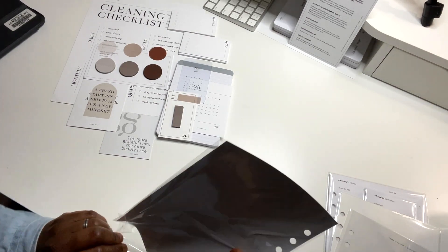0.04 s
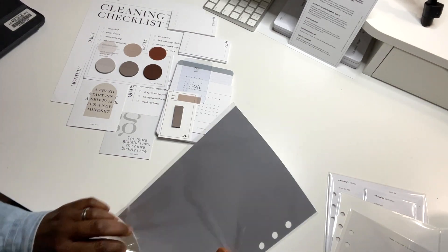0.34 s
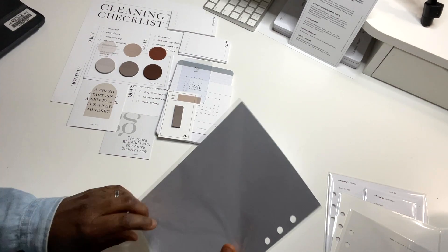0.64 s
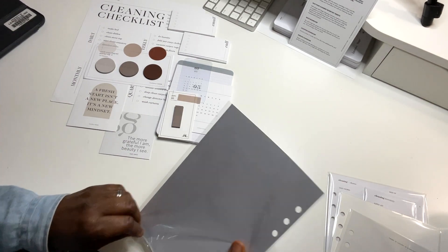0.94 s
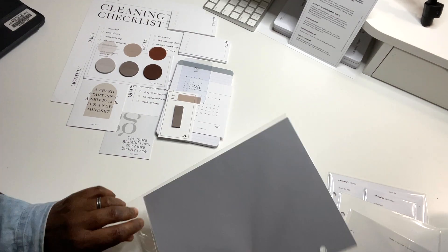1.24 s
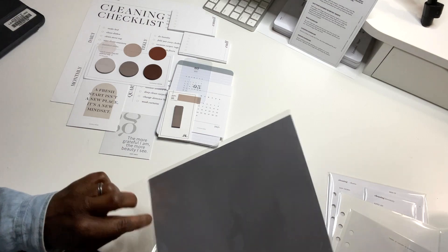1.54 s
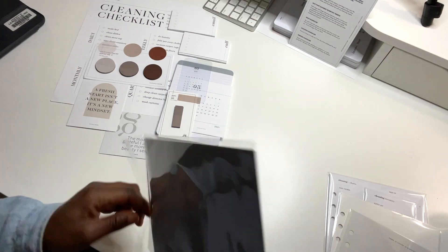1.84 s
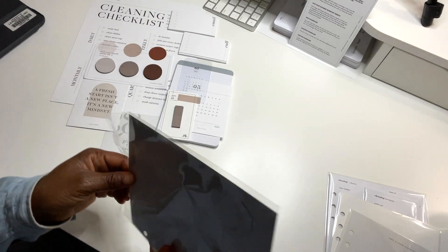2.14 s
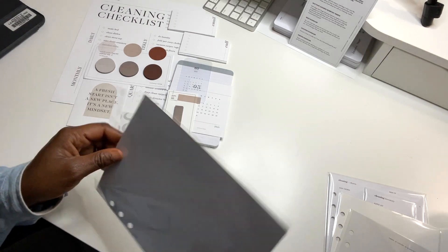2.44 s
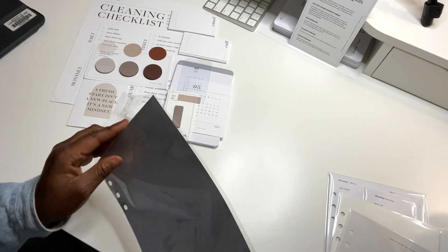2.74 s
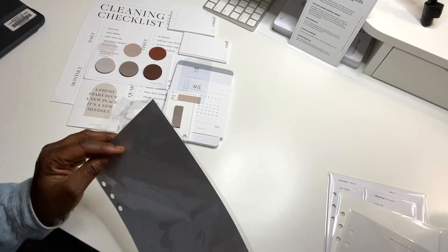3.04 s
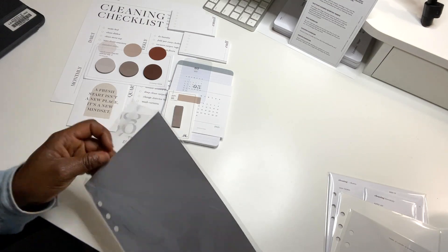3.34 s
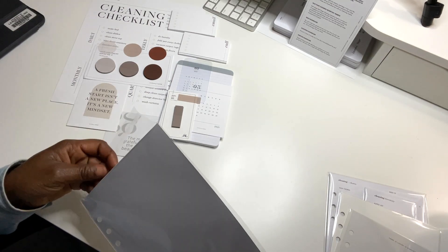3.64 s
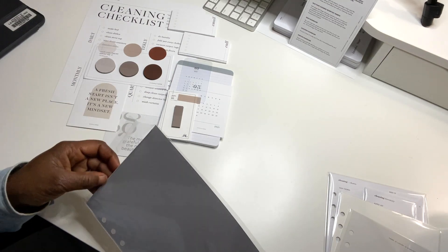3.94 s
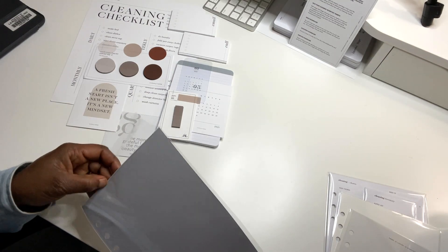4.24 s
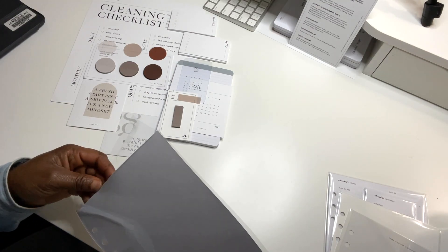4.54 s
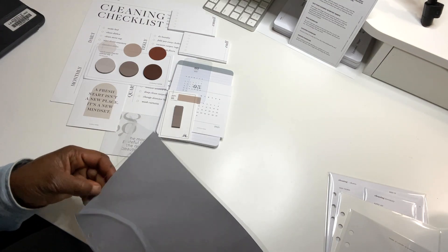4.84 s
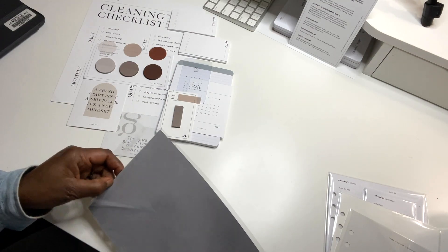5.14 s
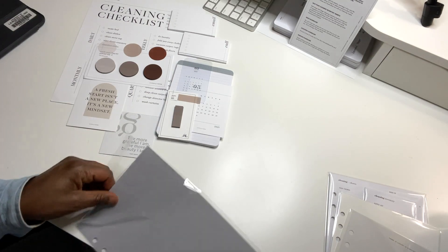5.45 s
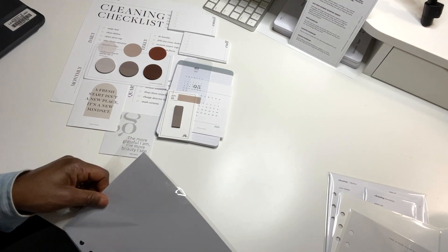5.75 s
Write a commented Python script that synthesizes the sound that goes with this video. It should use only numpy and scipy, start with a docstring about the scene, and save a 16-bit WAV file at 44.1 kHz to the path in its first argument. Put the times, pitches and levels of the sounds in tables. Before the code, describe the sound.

Hands flex a thin plastic sheet in a film sleeve, close to the microphone at a desk in a small room. From the start, creases buckle in a quick, irregular run of sharp snaps, with light crackling and short hisses of sliding film between them. The loudest cluster comes at about 1 second, together with a soft, low flap of the sheet. Separate snaps and lighter flaps follow until about 2.8 seconds, with one sharper snap near 2.6. Fingertips rub and squeak very faintly around 2.3 and 3 seconds. After that the snaps are quieter and drier, and the handling eases to sparse ticks and a faint rustle around 4 seconds. A last flurry of crinkles and slides builds from about 4.8 to 6 seconds, with clear snaps near 5.3 and 5.9. A low, steady rumble lies underneath throughout.

```python
"""A small room, the microphone near a desk; above it, hands flex a thin plastic sheet in a film sleeve.
Creases in the film buckle at once in a run of sharp snaps, loudest at 1 s, where the sheet also flaps.
Bending crackles and sliding film hisses in the gaps; fingertips rub and squeak faintly near 2.3 and 3 s.
The later, quieter snaps sound drier, the handling eases around 4 s, and a last flurry runs to 6 s.
A low rumble lies underneath throughout."""
import sys
import numpy as np
from scipy import signal
from scipy.fft import rfft, irfft, next_fast_len
from scipy.io import wavfile

SR = 44100
rng = np.random.default_rng(int(sys.argv[2]) if len(sys.argv) > 2 else 0)


def unload_wav(signal):
    """Save mono or channel-first audio to the path in sys.argv[1] as 16-bit WAV at rate SR, clipped to [-1, 1]."""
    wavfile.write(
        sys.argv[1],
        SR,
        np.round(np.clip(np.atleast_2d(signal).T, -1, 1) * 32767).astype(np.int16),
    )


N = 264159

# Levels in the tables are relative: the mix and the microphone shift them.
# creases buckling: start_s, level_db, pitch_hz, edge_db (against the level), decay_ms
CREASE_SNAPS = [(.0047, -31, 4610, -5, 1.2), (0.0283, -33.5, 2860, 8.5, 2.3), (.0863, -25, 4770, 7, 0.55),
                (0.2589, -34, 2110, -13, 1.3), (.2804, -26.5, 3320, -7, 1), (0.2956, -23, 2160, 9, 0.46),
                (.3238, -18, 2920, 2, 1), (0.3437, -31, 4120, 1, .7), (0.3799, -33, 5500, 8.5, 0.45),
                (.4065, -35.5, 5900, 18, 0.51), (.4173, -34.5, 6000, 7, .3), (.436, -40, 4200, 9, 1.1),
                (.4669, -31, 3500, -3, 1.3), (0.4828, -17.5, 3400, -6.5, 1.4), (.511, -36, 2900, -11, 0.64),
                (0.5208, -26.5, 2700, -2, 0.98), (0.5307, -23.5, 3500, -2, .4), (0.5644, -29, 5330, -1, .3),
                (0.5713, -34.5, 2900, 0, 0.74), (0.5892, -32.5, 2100, 1, 0.54),
                (0.6569, -29.5, 2800, -5, 1.6), (0.6783, -23, 3900, 2, 0.5), (.691, -28.5, 1960, -9, 4.5),
                (0.7217, -35.5, 4200, -2.5, 0.98), (0.7985, -37, 2900, -4, 1.1),
                (0.8261, -38, 1650, -15, 0.83), (.8324, -29, 4160, 5.5, 0.55),
                (0.8838, -36.5, 4100, -5, 1.2), (0.901, -39, 1300, -26, 0.91), (.923, -32, 1020, -26, 1),
                (.929, -32, 4540, 7.5, 0.59), (0.975, -17.5, 2930, 3.5, 2.2), (.982, -11, 1540, -1.5, 1.2),
                (0.987, -8.5, 2900, -6, 1.1), (0.9979, -16, 3000, 2.5, 2.8), (1.0044, -16, 2610, -5, 5.2),
                (1.157, -39.5, 1800, -2, .8), (1.1809, -31, 5130, -6, 0.7), (1.2496, -26, 3180, 5.5, 1.4),
                (1.3444, -18.5, 4350, 1, 0.51), (1.3467, -25.5, 3100, -1.5, 2.9),
                (1.4342, -36, 4600, 1, .8), (1.4594, -26, 4450, -1, 2.5), (1.5398, -28.5, 3640, 1, 8.9),
                (1.7579, -29.5, 3440, 4, 0.28), (1.76, -22.5, 3650, 6.5, 0.69),
                (1.9021, -34, 4430, 1, 0.85), (1.9095, -31, 4160, -6, 0.64), (1.9496, -29, 3300, -20, 1.3),
                (2.0185, -41, 3700, 4, 0.83), (2.0298, -25.5, 3230, -8, 1.2), (2.0723, -31, 4000, 0, 1.3),
                (2.121, -42.5, 1300, 0, 0.64), (2.3803, -52, 905, 0, .5), (2.4617, -35.5, 2580, -3, 1.5),
                (2.4722, -35.5, 2050, -2.5, 1.7), (2.4796, -32, 3840, -10, 0.94),
                (2.5178, -34.5, 2540, -2.5, 2.7), (2.566, -19.5, 5300, 0.5, 1.6),
                (2.6422, -39, 1900, -3, 2), (2.676, -40, 1500, -19, 2.9), (2.696, -31, 4370, -11, 0.61),
                (2.781, -34, 3030, 1, 1.3), (2.9978, -41.5, 1260, -1, 15), (3.119, -44.5, 2330, -1.5, 1.6),
                (3.181, -36.5, 2550, -7, 0.97), (3.221, -38, 4340, 7, 1.2), (3.243, -35, 3780, 8, 0.38),
                (3.265, -36.5, 1520, -21, 1.8), (3.3367, -42.5, 2880, -20, 1.1), (3.4908, -38, 6000, 8, .5),
                (3.512, -38, 3120, 0, 2.4), (3.5459, -34.5, 3330, 0, 1), (3.5555, -34, 3160, -1, 2.2),
                (3.926, -38.5, 3300, -20, 1.4), (4.156, -44.5, 2600, -13, 2.2),
                (4.2566, -29.5, 4780, 8, 0.37), (4.386, -37.5, 5430, 0, 1.1), (4.512, -37.5, 4190, 2, 2.5),
                (4.7806, -27.5, 2980, -9.5, 1), (4.8582, -37.5, 5350, 5, .6), (4.8731, -36, 5340, -7, 1.4),
                (4.898, -44, 4500, 14, 0.85), (4.9482, -32, 2750, 4, 1.5), (4.995, -39.5, 3000, -18, 4.7),
                (5.042, -36.5, 2020, 4, 1.2), (5.2562, -33, 4860, 8, 0.22), (5.291, -34, 2700, 7.5, 5.4),
                (5.318, -20.5, 5930, -1.5, 0.66), (5.3391, -31.5, 4800, 1, 0.58),
                (5.3686, -43, 1100, -12, 1.8), (5.4932, -32, 2130, -3, 0.64), (5.65, -31.5, 2030, -4, 5.4),
                (5.784, -44, 3000, -8, 2.8), (5.801, -39, 3730, 5, 1.2), (5.8112, -39, 3380, 1, 0.95),
                (5.8663, -37.5, 4200, 1.5, .5), (5.8744, -29.5, 4840, 5.5, .8), (5.896, -22, 2520, -1, 1.8),
                (5.8988, -27, 3240, -12, 9.2)]
# fixed pitches that ring faintly after each snap: pitch_hz, gain_db, t60_s
FAINT_RESONANCES = [(794, -42.5, 0.19), (736, -41.5, .16), (1240, -39, 0.088), (1444, -42, 0.087),
                    (1595, -36.5, 0.089), (2840, -38, 0.062), (3160, -43, 0.039)]
# taut patches of film singing after a snap: start_s, peak_db, pitch_hz
FILM_PINGS = [(.0854, -38.5, 3340), (.296, -36, 1270), (.484, -55, 3500), (4.511, -46, 4300)]
# the whole sheet flapping or being tapped: start_s, swing_db, pitch_hz
SHEET_FLAPS = [(0.083, -43.5, 106), (0.319, -35.5, 107), (.531, -36.5, 290), (0.678, -35.5, 107),
               (.977, -26, 118), (1.01, -27.5, 55.3), (1.341, -34, 127.2), (1.538, -32, 136),
               (1.76, -35, 108), (1.917, -36, 417), (1.949, -36.5, 190), (2.073, -34, 220),
               (2.377, -43, 192), (2.521, -42, 100), (2.543, -38.5, 140), (2.565, -38, 89),
               (2.718, -43.5, 131), (3.265, -42.5, 445), (4.87, -45.5, 167), (5.3, -41, 57),
               (5.368, -40.5, 156), (5.482, -39, 390), (5.874, -36, 83), (5.898, -33.5, 302)]
# fingertips rubbing: start_s, length_s, level_db, pitch_hz, width_hz
FINGER_RUBS = [(.143, 0.029, -54.5, 1300, 200), (2.253, .1, -61, 4240, 500),
               (2.268, 0.091, -55, 13000, 4000), (2.983, 0.0254, -55.5, 1030, 260)]
# the hands bending the sheet: start_s, length_s, crackle_db, flutter_db
HAND_BENDS = [(0, 0.039, -49, -51), (0.288, 0.075, -40.5, -51), (0.494, .1, -52.5, -74),
              (0.637, .05, -49, -59), (0.816, 0.032, -51.5, -58), (0.927, 0.06, -49.5, -53),
              (0.967, 0.08, -50, -50), (1.24, 0.044, -45, -65), (1.335, 0.049, -45, -64),
              (1.425, 0.16, -53, -57), (1.672, 0.083, -58.5, -57), (1.887, 0.053, -54.5, -47.5),
              (1.99, 0.052, -57, -53), (2.058, 0.027, -65, -52), (2.269, 0.08, -67, -61),
              (2.444, 0.048, -54.5, -55.5), (2.515, 0.041, -65, -57), (2.685, 0.033, -52.5, -54.5),
              (2.76, 0.077, -58, -63), (2.888, 0.028, -57, -57), (2.988, 0.02, -52.5, -57.5),
              (3.182, 0.1, -57, -61), (3.33, 0.19, -65.5, -76), (3.844, 0.014, -56, -61.5),
              (4.171, 0.036, -62, -57), (4.461, .27, -76, -77), (4.875, 0.21, -58.5, -63.5),
              (5.133, 0.043, -71, -64), (5.215, 0.087, -63, -50.5), (5.317, 0.18, -57, -52.5),
              (5.544, 0.071, -57.5, -58), (5.85, 0.048, -49.5, -54)]
# the film sliding over the sheet: start_s, length_s, level_db
FILM_SLIDES = [(.09, 0.044, -51.5), (.365, 0.064, -60.5), (.61, 0.042, -54), (1, .035, -40),
               (1.255, 0.037, -46.5), (1.455, .05, -57), (1.65, 0.08, -56.5), (1.9, 0.065, -51.5),
               (2.02, 0.065, -55), (2.28, 0.073, -58), (2.575, 0.036, -51.5), (2.895, 0.025, -64.5),
               (2.99, 0.026, -56.5), (3.2, 0.023, -52), (3.35, 0.088, -79), (3.488, 0.018, -46.5),
               (3.545, 0.054, -60), (3.9, 0.17, -72), (4.165, 0.026, -55), (5.09, 0.022, -52.5),
               (5.22, 0.056, -56.5), (5.285, 0.007, -43), (5.35, 0.13, -56), (5.438, 0.042, -44),
               (5.88, 0.064, -46)]
# faint rustle of the held sheet: time_s, level_db
HELD_RUSTLE = [(0, -55.5), (.22, -63), (.55, -51), (.78, -71.5), (1.2, -61), (1.52, -55.5), (1.62, -68),
               (2.06, -61.5), (2.2, -70), (2.55, -59.5), (2.96, -68.5), (3.42, -62), (3.76, -72),
               (4, -71.5), (4.72, -81), (4.899, -66.5), (5.7, -63.5), (5.99, -55.5)]
# spectra of ticking creases, sliding film and fluttering sheet: frequency_hz, density_db
CRACKLE_SPECTRUM = [(500, -13.5), (800, 1), (1300, -5.5), (2000, -1), (3200, 1), (5000, -3), (7000, -9),
                    (12000, -4.5)]
HISS_SPECTRUM = [(2500, -9), (4000, -9.5), (5500, -7), (8000, -10.5), (10500, -6.5), (13000, -3),
                 (16000, -9.5)]
FLUTTER_SPECTRUM = [(60, 5), (110, 5), (200, -7), (350, -8), (600, -9), (900, -11.5), (1600, -34)]
# share of the sound that echoes over time: time_s, share_db
ROOM_SHARE = [(0, -1.5), (3.402, -5), (4.2, -3.5), (5.99, -3)]
# colour of the room's echo: frequency_hz, level_db
ECHO_SPECTRUM = [(100, -21.5), (400, -3.5), (1200, -5), (3000, -7.5), (6000, -10), (10000, -10.5),
                 (16000, -16.5)]
# decay of the room's echo: frequency_hz, t60_s
ECHO_DECAY = [(100, .35), (500, 0.29), (1500, 0.39), (4000, 0.33), (9000, 0.44), (16000, 0.53)]
# spectra of the background rumble and faint airy hiss: frequency_hz, density_db
RUMBLE_SPECTRUM = [(4, 19.5), (12, 10.5), (22, 3), (35, -13), (55, -3), (75, -18), (120, -25), (200, -28.5),
                   (400, -38), (900, -46)]
AIR_SPECTRUM = [(300, 8.5), (1000, -23.5), (3000, -6), (7000, -19.5), (16000, -15.5)]
# microphone colour: frequency_hz, gain_db
MIC_RESPONSE = [(100, -2.5), (300, 3.5), (600, 0.5), (900, 0.5), (1350, 7), (2000, 1.5), (3200, 1),
                (4500, 1), (7000, 5), (10000, -0.5), (13000, -5.5), (16000, -10)]

BODY_DB, BODY_AT_HZ, BODY_DB_PER_OCTAVE = -10.5, 3500, -7.5  # a larger, lower facet drags more film along
THINNING_DB_PER_DB, MIDDLING_DB = 0.14, -31  # a harder snap has less body
SETTLE_MS, SETTLE_DB = 4.4, -16  # a crease settles just after it has flipped
OVERLOAD, CUTOFF_HZ = 0.46, 16500  # peaks round off towards this height; top of the treble


def crease_snaps(kick=5.1, shudder_db=-13, shudder_ms=3.6, trim_db=-2.5, size=1536):
    """A crease flips with one kick; bending waves scatter through the film and die in milliseconds."""
    out, ms = np.zeros(N), np.arange(size) * 1000 / SR
    for s, level_db, hz, edge_db, decay_ms in CREASE_SNAPS:
        scatter = rng.standard_normal(size)
        push = scatter * (np.exp(-ms / decay_ms) + from_db(shudder_db) * np.exp(-ms / shudder_ms))
        push[0] += kick
        delay_ms = SETTLE_MS * np.exp(0.43 * scatter[-1])  # random for each crease
        push += from_db(SETTLE_DB) * np.interp(ms - delay_ms, ms, push, left=0)
        body_db = BODY_DB + BODY_DB_PER_OCTAVE * np.log2(hz / BODY_AT_HZ)
        body_db -= THINNING_DB_PER_DB * (level_db - MIDDLING_DB)
        facet = rms_one(band(resonate(push, hz, 0.75 * hz), 1300, 6100))  # the patch that flips
        body = rms_one(band(push, 499, 1270))  # the film around it follows
        edge = rms_one(band(push, 9100, 14600))  # the sharp ridge itself
        snap = facet + from_db(body_db) * body + from_db(edge_db) * edge
        add(out, s, from_db(level_db + trim_db) * snap / np.sqrt(ms[-1]))
    return out


def faint_ring(snaps):
    """A few fixed pitches ring faintly after each snap."""
    out = np.zeros(N)
    for hz, gain_db, t60_s in FAINT_RESONANCES:
        radius, angle = from_db(-60 / (t60_s * SR)), 2 * np.pi * hz / SR
        feedback = [1, -2 * radius * np.cos(angle), radius ** 2]
        out += from_db(gain_db) * signal.lfilter([0, np.sin(angle)], feedback, snaps + 1e-18)
    return out


def film_pings(decay_s=0.021, size=8192):
    """A taut patch has many close modes: a narrow, fading ring."""
    out, t = np.zeros(N), np.arange(size) / SR
    for s, peak_db, hz in FILM_PINGS:
        ring = band(rng.standard_normal(size), .94 * hz, 1.06 * hz) * np.exp(-t / decay_s)
        add(out, s, from_db(peak_db) * ring / np.abs(ring).max())
    return out


def sheet_flaps(decay_cycles=0.32, puff_db=-7, puff_s=0.012, waft_db=-12, waft_s=0.057, size=9000):
    """The sheet flips over in about one swing, with a papery puff and a slower waft of air."""
    out, t = np.zeros(N), np.arange(size) / SR
    for s, swing_db, hz in SHEET_FLAPS:
        noise = rng.standard_normal(size)
        swing = np.sin(2 * np.pi * hz * t) * t * np.exp(-t * hz / decay_cycles)  # a push, then a pull
        puff = from_db(puff_db) * rms_one(band(noise, 77, 360, order=1)) * np.exp(-t / puff_s)
        waft = from_db(waft_db) * rms_one(band(noise, 25, 58)) * np.exp(-t / waft_s)
        add(out, s, from_db(swing_db) * (swing / np.abs(swing).max() + puff + waft))
    return out


def rustle():
    """Bending makes creases tick and the sheet flutter; sliding film hisses; a held sheet whispers."""
    crackle_gain = from_db(-1.5) * hand_strokes([(s, length, db) for s, length, db, _ in HAND_BENDS])
    flutter_gain = from_db(-1.5) * hand_strokes([(s, length, db) for s, length, _, db in HAND_BENDS])
    hiss_gain = from_db(-0.5) * hand_strokes(FILM_SLIDES)
    held_gain = gain_curve(HELD_RUSTLE)
    crackle = colour(crinkles(), CRACKLE_SPECTRUM)
    whisper = colour(grains(per_s=1000, spread_db=7, friction=1.5), CRACKLE_SPECTRUM)
    hiss = colour(grains(per_s=1300, spread_db=5.5, friction=1.4), HISS_SPECTRUM)
    flutter = colour(grains(per_s=160, spread_db=8, friction=0.79), FLUTTER_SPECTRUM)
    moving = crackle_gain * crackle + hiss_gain * hiss + flutter_gain * flutter
    held = from_db(-2.5) * whisper + from_db(-3.5) * hiss + from_db(-4) * flutter
    return moving + held_gain * held


def hand_strokes(rows, attack_s=0.0072, release_s=0.011):
    """Gain over time: each movement of the hands swells, holds and dies away."""
    t = np.linspace(0, N / SR, 6000)
    gain = np.zeros_like(t)
    for s, length_s, level_db in rows:
        attack = np.clip((t - s) / attack_s + .5, 0, 1)
        release = np.exp(-np.clip((t - s - length_s) / release_s, 0, 20))
        gain += from_db(level_db) * attack * release
    return np.interp(np.arange(N) / SR, t, gain)


def crinkles(pitches=9):
    """Tiny creases tick, each at one of several pitches, on a bed of friction noise."""
    ticks = grains(per_s=330, spread_db=5, friction=0)
    pitch_index = rng.integers(0, pitches, N)
    pitched = sum(resonate(ticks * (pitch_index == k) + 1e-18, hz, .9 * hz) / hz ** .25
                  for k, hz in enumerate(np.geomspace(1300, 12000, pitches)))
    return rms_one(pitched) + rng.standard_normal(N)


def grains(per_s, spread_db, friction):
    """Tiny clicks of very uneven size on a bed of friction noise."""
    sizes = from_db(spread_db * np.minimum(rng.exponential(1, N), 4)) * rng.choice([-1, 1], N)
    clicks = sizes * (rng.random(N) < per_s / SR)
    return rms_one(clicks) + friction * rng.standard_normal(N)


def finger_rubs():
    """Skin or film sticks and slips; a tight grip gives a narrow squeak, a light one a swish."""
    out = np.zeros(N)
    for s, length_s, level_db, hz, width_hz in FINGER_RUBS:
        size = round(length_s * SR)
        slips = rms_one(resonate(rng.laplace(0, 1, size), hz, width_hz))
        add(out, s, from_db(level_db) * slips * signal.windows.tukey(size, .5))
    return out


def room_echo(x, build_s=0.0035, desk_s=0.002, desk_db=-36.5):
    """A bounce off the desk reaches the microphone, then the small room's short diffuse tail."""
    t = np.arange(SR // 2) / SR
    edges_hz = np.geomspace(70, 18000, 13)
    white, echo = rng.standard_normal((2, len(t))), np.zeros(len(t))
    for k, (low, high) in enumerate(zip(edges_hz, edges_hz[1:])):
        hz = np.sqrt(low * high)
        fade = from_db(-60 * t / at_hz(ECHO_DECAY, hz)) * (1 - np.exp(-t / build_s))
        tail = rms_one(band(white[k % 2], low, high) * fade)
        share = 2 * (high - low) / SR  # this band's part of a click's energy
        echo += from_db(at_hz(ECHO_SPECTRUM, hz)) * np.sqrt(share / len(t)) * tail
    echo[round(desk_s * SR)] += from_db(desk_db)
    return signal.fftconvolve(x, echo)[:N]


def room_tone(rumble_db=-37.5, air_db=-76):
    """Steady noise under everything: a low rumble and a faint airy hiss."""
    rumble = from_db(rumble_db) * colour(rng.standard_normal(N), RUMBLE_SPECTRUM)
    air = from_db(air_db) * colour(rng.standard_normal(N), AIR_SPECTRUM)
    return rumble + air


def from_db(db):
    """Decibels to gain."""
    return 10 ** (np.asarray(db) / 20)


def rms_one(x):
    """Scale to rms 1."""
    return x / np.sqrt(np.mean(x ** 2) + 1e-20)


def gain_curve(points):
    """Gain at every sample from rows of time_s, level_db."""
    return from_db(np.interp(np.arange(N) / SR, *np.transpose(points)))


def at_hz(points, hz):
    """Read a table on a log-frequency axis."""
    table_hz, value = np.transpose(points)
    return np.interp(np.log(np.maximum(hz, 1)), np.log(table_hz), value)


def band(x, low_hz, high_hz, order=2):
    """Causal band-pass."""
    return signal.sosfilt(signal.butter(order, [low_hz, high_hz], "band", fs=SR, output="sos"), x)


def resonate(x, hz, width_hz):
    """One resonance, gain 1 at its peak."""
    radius = np.exp(-np.pi * width_hz / SR)
    feedback = [1, -2 * radius * np.cos(2 * np.pi * hz / SR), radius ** 2]
    return signal.lfilter(np.array([1, 0, -1]) * (1 - radius ** 2) / 2, feedback, x)


def colour(x, spectrum):
    """Give x a spectrum that falls away beyond both ends; rms 1."""
    size = next_fast_len(N)
    hz = np.arange(size // 2 + 1) * SR / size + 1
    skirts = np.minimum(hz / spectrum[0][0], 1) * np.minimum(spectrum[-1][0] / hz, 1)
    gain = from_db(at_hz(spectrum, hz)) * skirts ** 2
    return rms_one(irfft(rfft(x, size) * gain, size)[:N])


def add(out, s, sound):
    """Mix a sound in at s seconds."""
    start = min(max(round(s * SR), 0), N)
    out[start:start + len(sound)] += sound[:N - start]


def scene():
    """What reaches the one microphone: the handled sheet, its echo and the room tone."""
    snaps = crease_snaps()
    handling = snaps + from_db(-29) * faint_ring(snaps) + film_pings()
    handling += finger_rubs() + sheet_flaps() + rustle()
    echo = room_echo(handling * gain_curve(ROOM_SHARE))
    return (handling + echo + room_tone())[None]


def record(dry):
    """The microphone colours the sound; the recorder rounds the peaks and cuts the top steeply."""
    hz = np.linspace(0, SR / 2, 1025)
    mic_power = from_db(at_hz(MIC_RESPONSE, hz)) ** 2  # minimum_phase takes the square root
    mic_impulse = signal.minimum_phase(signal.firwin2(1023, hz, mic_power, fs=SR))
    coloured = signal.fftconvolve(dry, mic_impulse[None])[:, :N]
    rounded = OVERLOAD * np.tanh(coloured / OVERLOAD)
    top_cut = signal.ellip(10, .2, 80, CUTOFF_HZ, fs=SR, output="sos")
    return signal.sosfilt(top_cut, rounded)


dry = scene()
out = record(dry)
unload_wav(out)
```